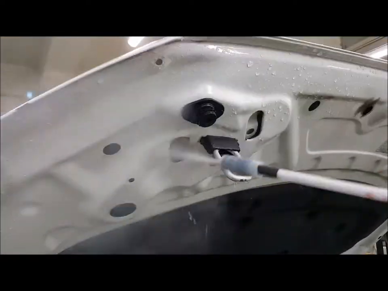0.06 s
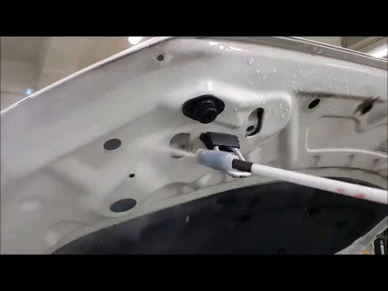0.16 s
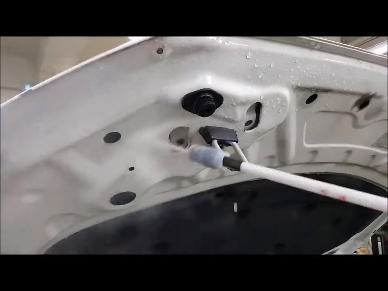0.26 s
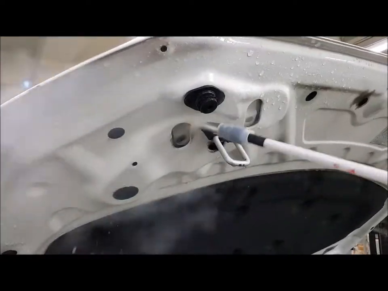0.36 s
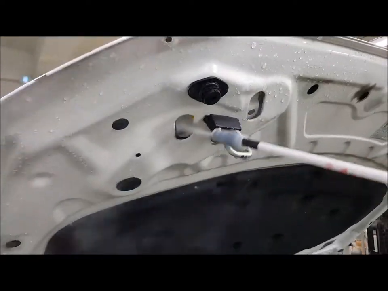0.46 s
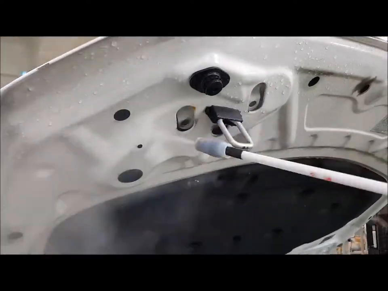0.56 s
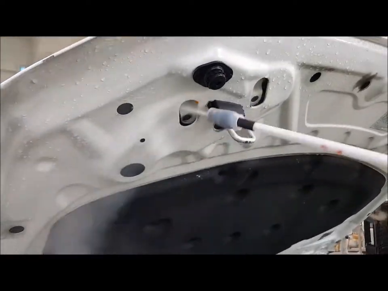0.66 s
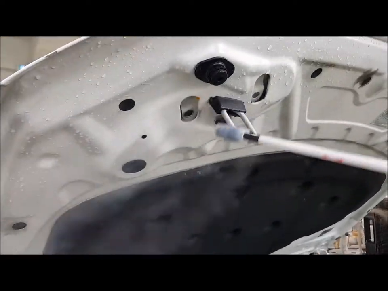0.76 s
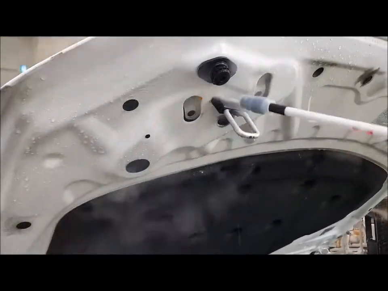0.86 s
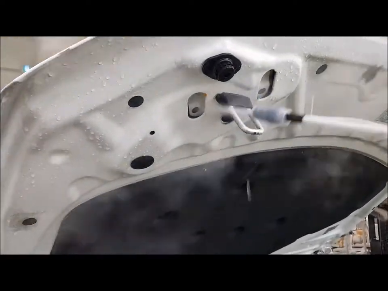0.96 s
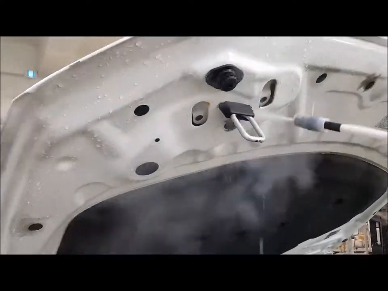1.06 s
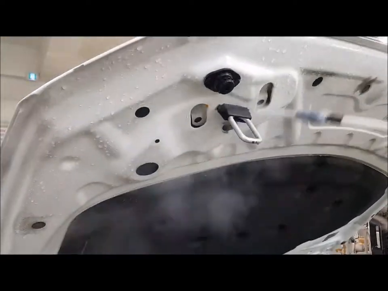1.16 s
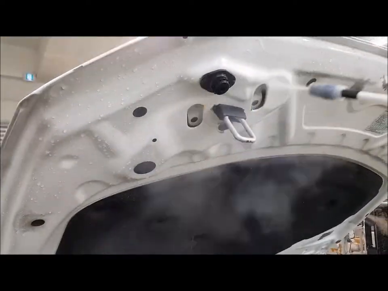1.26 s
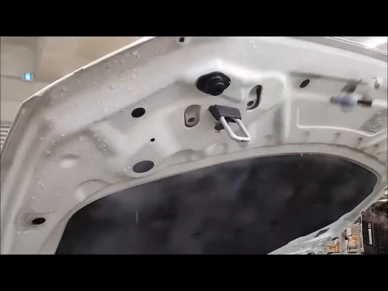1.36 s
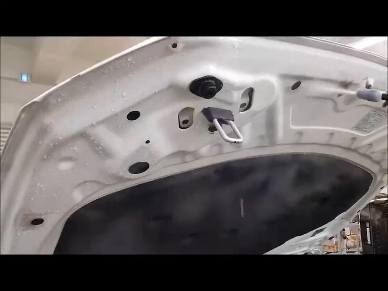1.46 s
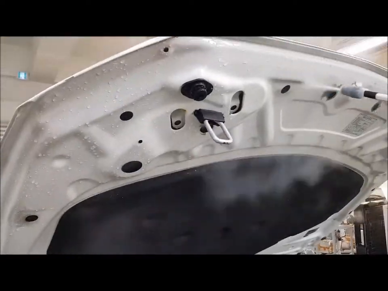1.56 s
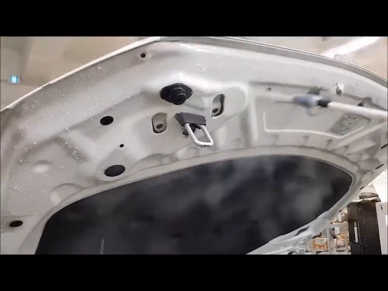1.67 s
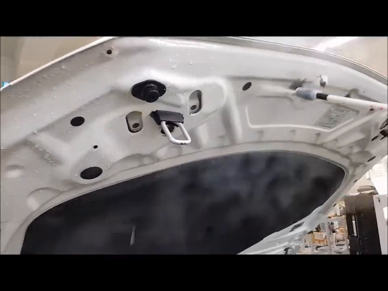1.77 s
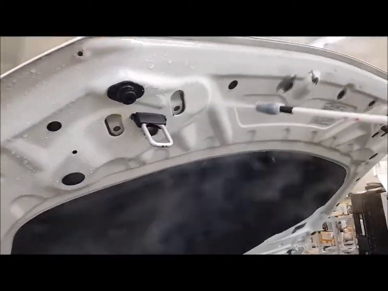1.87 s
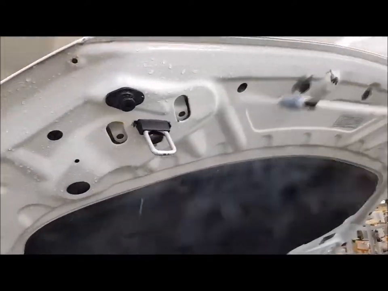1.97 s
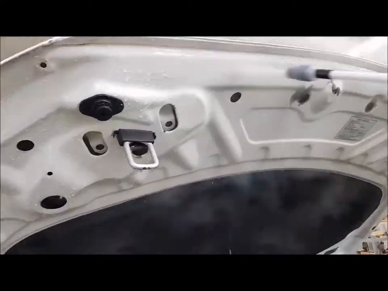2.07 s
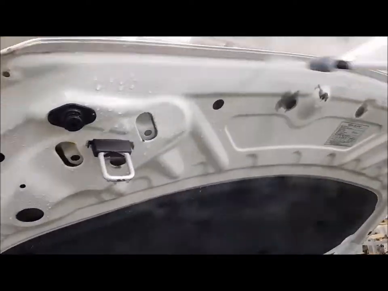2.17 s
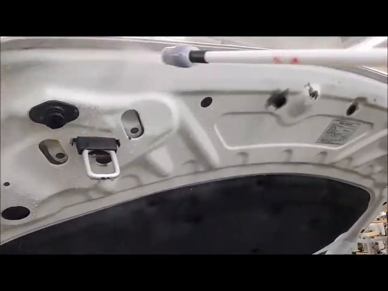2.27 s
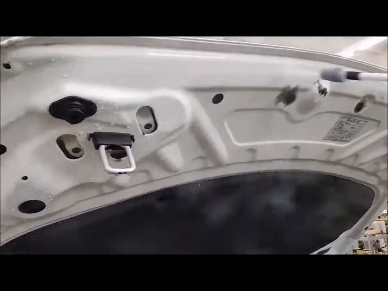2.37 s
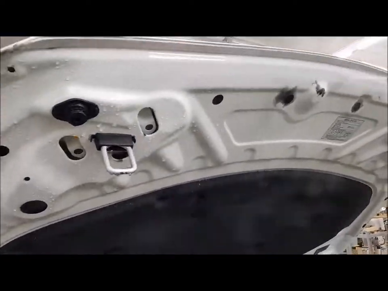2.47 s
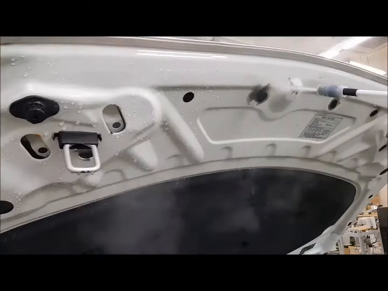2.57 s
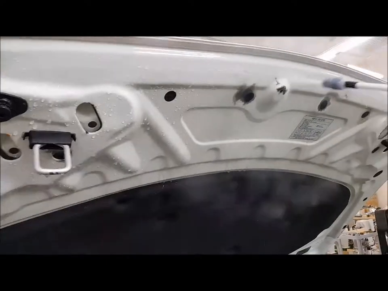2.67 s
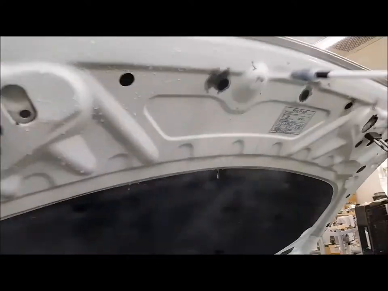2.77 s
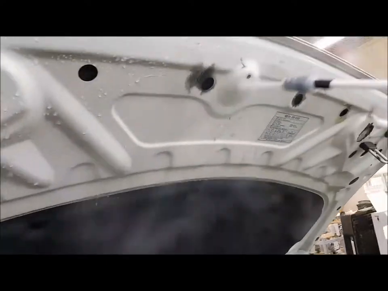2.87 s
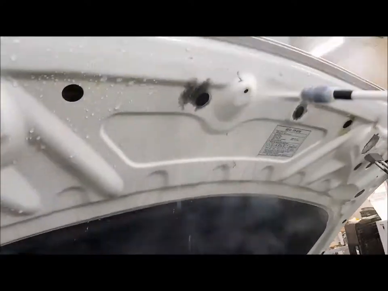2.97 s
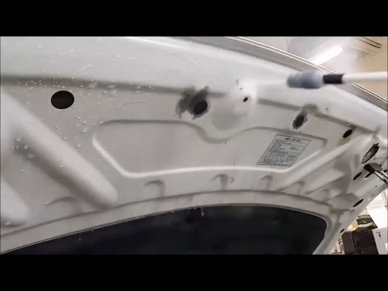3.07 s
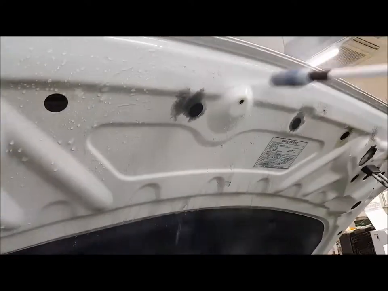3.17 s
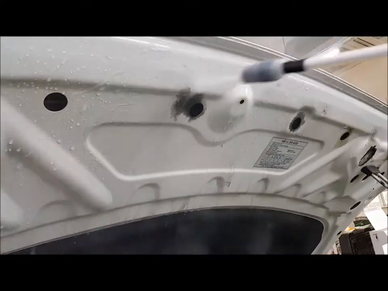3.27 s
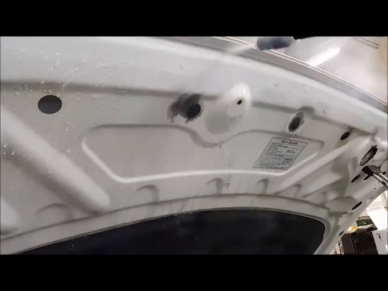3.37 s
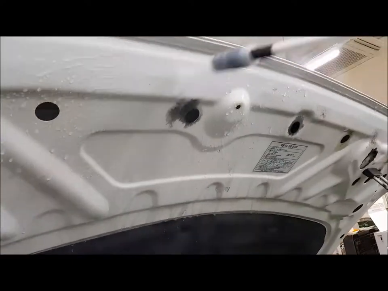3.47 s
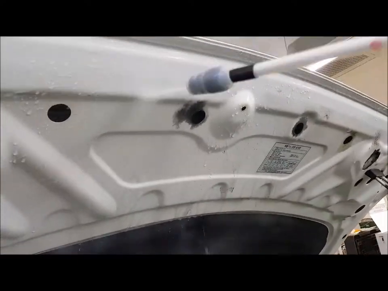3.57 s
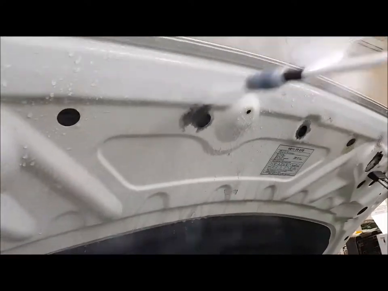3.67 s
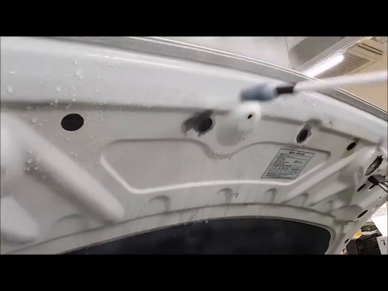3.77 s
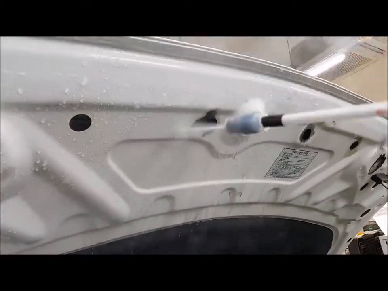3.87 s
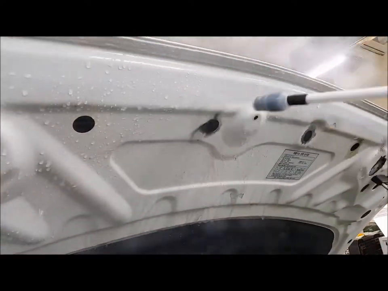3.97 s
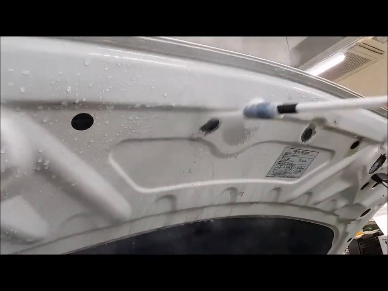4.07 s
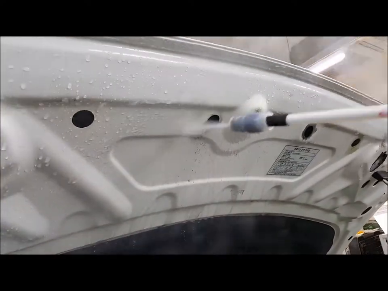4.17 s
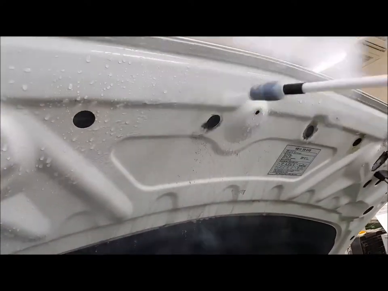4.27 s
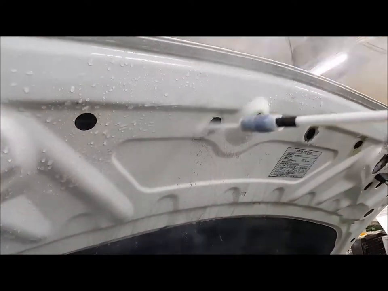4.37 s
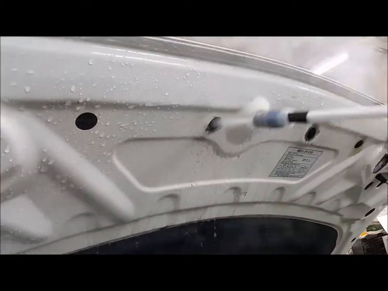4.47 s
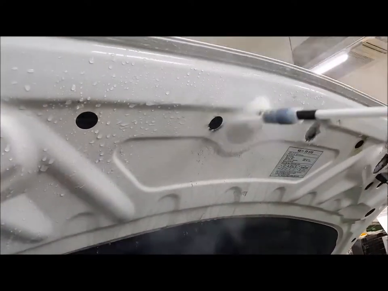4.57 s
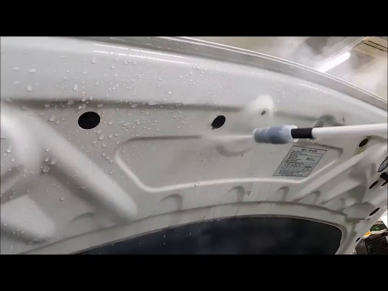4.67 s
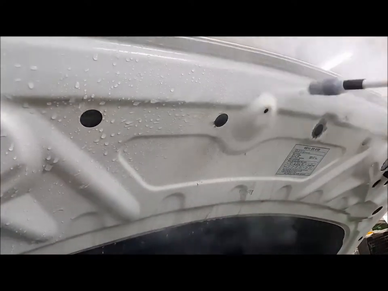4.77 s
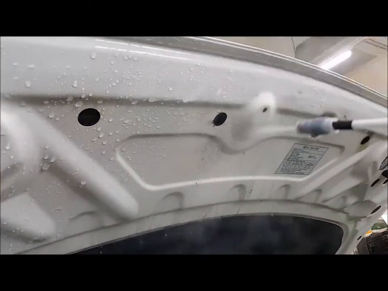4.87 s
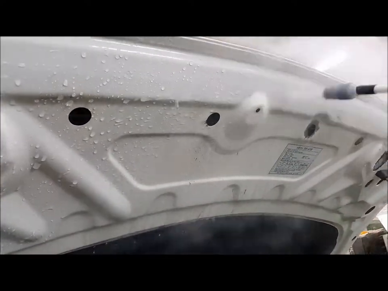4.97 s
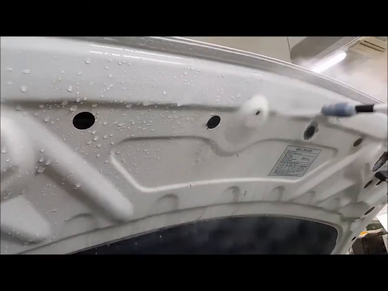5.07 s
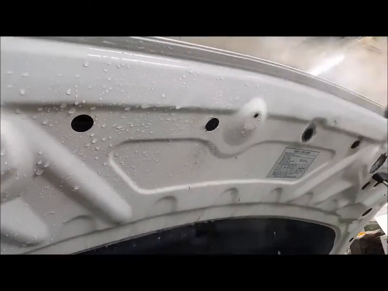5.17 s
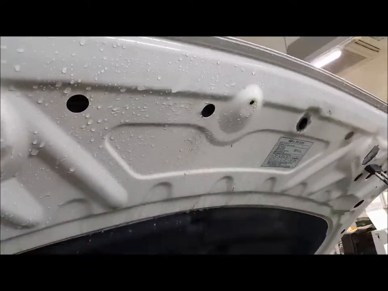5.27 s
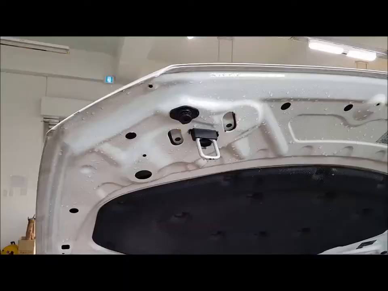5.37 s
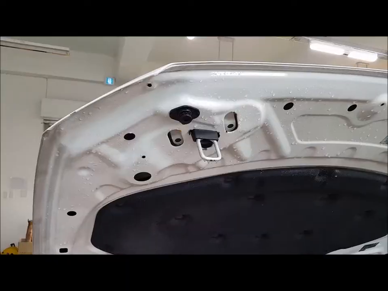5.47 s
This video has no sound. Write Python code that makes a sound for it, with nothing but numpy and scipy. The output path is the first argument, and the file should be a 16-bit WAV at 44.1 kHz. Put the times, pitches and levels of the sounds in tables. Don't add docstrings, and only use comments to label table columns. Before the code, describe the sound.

Loud wet steam hiss, recorded close on a phone in slight stereo, splashes in rapid pulses against hollow sheet metal. It shifts between duller bursts and sharp sizzling, with a few small water thuds. Near the end the spray drops away quickly, an electric pump hum comes up, and the panel booms once, low and short.

```python
import sys
import numpy as np
from scipy import signal
from scipy.fft import rfft, irfft, next_fast_len
from scipy.io import wavfile
from scipy.ndimage import uniform_filter1d

SR = 44100
rng = np.random.default_rng(int(sys.argv[2]) if len(sys.argv) > 2 else 0)


def nominal_scale(level):
    x = np.asarray(level, float) / 20
    return 10 ** x


def master_out(mix):
    frames = np.transpose(np.atleast_2d(mix))
    ceiling = np.clip(frames, -1, 1)
    pcm = np.round(ceiling * 32767).astype(np.int16)
    wavfile.write(sys.argv[1], SR, pcm)


N = 242991
T = np.arange(N) / SR

# (frequency [Hz], density [dB per Hz])
SPRAY_COLOUR = [(35, -38), (100, -39.5), (200, -32), (360, -24), (490, -20.5), (800, -16.5), (1200, -10),
                (1400, -4.5), (2600, -4.5), (4000, -2.5), (6000, -1.5), (9400, 0), (13000, -6),
                (15800, -5.5)]
# (frequency [Hz], free jet [0-1], splash [0-1])
COHERENCE = [(60, .8, 0.8), (300, 0.46, 1), (1400, 0.82, 1), (3160, 0.89, 0.95), (6700, 0.73, 0.77),
             (10900, 0.45, 0.24), (14900, 0.26, 0.32)]
# (drum to, panel from, panel to, body from, body to, sizzle from [Hz])
RANGE_CORNERS = (1000, 1450, 2400, 3300, 5000, 9000)
# (from [Hz], to [Hz])
RANGE_BANDS = ((250, 900), (1250, 2800), (2800, 7000), (7000, 16000))
# (time [s], steam flow as hiss level [dB], extra roar near the metal [dB])
LANCE_MOTION = [(0, -30.5, 2), (.3, -28, 3.5), (1.0, -25.5, -1.5), (1.2, -26, 0.3), (1.5, -28.5, -2),
                (1.8, -30, 1), (2.0, -29.5, -4), (2.35, -29.5, 1.5), (2.6, -31, -0.5), (3.0, -29.5, 0.5),
                (3.2, -27, -4), (3.4, -28, -1.5), (3.6, -28, -4.5), (4.0, -27.5, -1), (4.4, -28.5, -3.5),
                (4.8, -32, 2), (5.0, -27.5, -6), (5.235, -25, -8)]
# (time [s], length [ms], level change [dB])
HOLE_DIPS = [
    (.725, 28, -4.5),
    (1.085, 23, -4),
    (1.205, 15, -3.5),
    (1.58, 30, -2),
    (1.925, 30, -2.5),
    (3.07, 25, -2),
    (3.73, 16, -1),
]
# (time [s], length [ms], extra drumming [dB])
WATER_SLUGS = [
    (.55, 13, 5),
    (.77, 16, 9),
    (4.5, 18, 5.5),
]
# (first
# time [s], last time [s], level [dB], length [ms], sizzle relative to body [dB])
ONTO_RIB = [(.139, .201, -18.5, 19, -15), (.414, .472, -22.5, 7.2, 1), (.445, .561, -22.5, 7.1, 1),
            (.865, .927, -24, 17, 2.5), (.987, 1.048, -21.5, 18, -2), (1.112, 1.112, -18.5, 12, -1.5),
            (1.537, 1.605, -18.5, 12.3, 0.5), (1.682, 1.816, -19.5, 13.7, 1.5),
            (1.719, 1.785, -19, 10.4, 3), (1.975, 1.975, -19, 10, 0), (2.028, 2.028, -23.5, 14, 3),
            (2.84, 2.84, -20.5, 14, -6), (2.903, 2.965, -20.5, 13, 5.5), (3.023, 3.023, -24, 9.1, 2.5),
            (3.149, 3.2, -18, 21.5, -6.5), (3.366, 3.491, -24.5, 21, -7), (3.87, 3.99, -24, 15, -5),
            (4.052, 4.233, -17.5, 11.5, -2), (4.354, 4.415, -20.5, 14, -2), (4.477, 4.602, -16, 9.3, .4),
            (4.663, 4.721, -17, 9.2, 0), (4.781, 4.781, -20, 14, -.4), (4.881, 4.945, -26, 7, 3.5),
            (5.395, 5.395, -52, 18, 9)]
# (first time [s], last time [s], level [dB], length [ms], sizzle relative to body [dB])
OFF_RIB = [(.262, .37, -17, 11.6, -22), (.59, .65, -23.5, 8, 0), (.692, .75, -25.5, 13, 5.5),
           (1.183, 1.183, -21, 8.9, 6), (1.243, 1.243, -22.5, 23, 0), (2.001, 2.058, -19.5, 14.5, 0.5),
           (2.664, 2.735, -16.5, 18.5, -7), (2.866, 2.989, -20, 10.6, 1.5), (3.05, 3.05, -27, 11, -10),
           (3.105, 3.105, -20.5, 7.4, 3.5), (3.258, 3.314, -17, 15, -14), (3.64, 3.693, -31.5, 8.3, 9),
           (3.77, 3.832, -23, 12, -5), (3.955, 4.259, -18, 10, -2), (4.444, 4.751, -18, 12.8, -0.5)]
# (time [s], level [dB], length [ms], sizzle relative to body [dB], panel relative to body [dB])
LONE_EDGES = [(.021, -26, 14, -6, -18), (.095, -14, 24, -27, -11.5), (.796, -25.5, 34, 3.5, -22),
              (1.288, -28.5, 33, 10.5, -5), (1.331, -24, 17, 8, -9), (1.365, -20.5, 13, 6.5, -14),
              (1.396, -25, 19, 5, -11), (1.5, -30, 15, 9.5, -13), (1.649, -18.5, 14, -0.5, -21),
              (1.848, -19.5, 6.5, 2.5, -11), (1.88, -18.5, 6.7, -6, -10.5), (1.943, -26, 8, 4, -7),
              (2.117, -16, 6.1, 2, -11), (2.155, -29.5, 33, 0, -1.5), (2.41, -35.5, 23, 12, 7),
              (2.483, -38.5, 27, -11, 12), (2.611, -34.5, 21, -4, 1), (2.79, -16.5, 16, -12, -10),
              (4.299, -19, 22, -5.5, -16), (4.385, -25, 8.7, -7, -2), (4.835, -28.5, 23, 4.5, -3.5),
              (4.914, -25, 6.5, 4, -14)]
# (from time [s], tones (frequency [Hz], level [dB]))
HOLLOWS = [
    (0, [(4050, 0.5), (4700, -7), (5490, 1.5), (7870, -2.5), (14400, 2)]),
    (.6, [(5580, 5.5), (7000, 2), (8110, -3.5), (8820, 2.5), (11250, 4.5), (12500, -9), (14300, 3)]),
    (1.15, [(5040, -6), (5980, 6), (8000, -10), (9050, 4), (10300, 2), (10910, -13)]),
    (1.45, [(2200, 2), (2550, 6), (2960, -1.5), (3430, 4.5), (4180, 2.5), (5150, -10), (6060, 1.5), (10660, 3)]),
    (2.25, [(6160, 3.5), (12680, -6), (14600, 2)]),
    (2.62, [(2450, 3.5), (2830, -3.5), (3360, 3.5), (4000, 2.5), (5650, 2), (15010, 2)]),
    (3.1, [(2680, -4), (3100, 2), (4020, 2.5), (4570, -1.5), (9900, 1), (11050, 2.5), (12800, 1), (15400, 2)]),
    (3.85, [(2660, -3), (3100, 2), (3990, 3), (4610, -2), (5500, 3), (6650, -2), (10400, 2.5), (12800, 3), (15400, 3)]),
    (4.85, [(10420, 2), (12610, 1.5)]),
]
# (panel under jet [dB], panel under splash [dB], left minus right [dB],
# drumming [dB], air at the top [dB])
PANEL_RESPONSE = [(-5.5, -14, 1.4, 0.5, 0), (-8, -11, .7, 0, .3), (-10, -7.5, -0.3, -0.5, 1),
                  (-5.5, -11.5, -0.5, -2, 0.5), (-9, -9, -.2, 1.7, -1), (-7, -8, .3, -1, 1.5),
                  (-4.5, -8.5, .5, 0.7, 1), (-5, -11, -0.3, -0.5, 1), (-11, -7.5, -.9, 0.5, -1.2)]
# (time [s], frequency [Hz], level [dB], decay time T60 [s])
PANEL_BOOM = (5.453, 220, -30, .8)
# (frequency [Hz], level [dB rms])
PUMP_LINES = [(240, -63), (480.5, -52), (960.3, -47), (1201, -57), (1441, -47.5), (2643, -65), (4199, -62),
              (5283, -61), (5522, -62)]

TOP_HZ = 15860
SPIN_HZ = 16.3
LONE_LEAN = 0.092


def walk(rate):
    hold = int(SR / rate)
    steps = np.repeat(rng.standard_normal(N // hold + 1), hold)
    level = uniform_filter1d(uniform_filter1d(steps, hold), hold)[:N]
    return level / level.std()


def bell(centre_s, length_ms):
    return np.exp(-.5 * ((T - centre_s) / (length_ms / 2355)) ** 2)


def place_index():
    return np.searchsorted([start for start, _ in HOLLOWS], T, side="right") - 1


def at_place(column, glide_s=.2):
    held = np.asarray(column, float)[place_index()]
    return uniform_filter1d(held, int(glide_s * SR), mode="nearest")


def free_jet():
    _, flow, near = (np.interp(T, np.transpose(LANCE_MOTION)[0], c) for c in np.transpose(LANCE_MOTION))
    panel, _, pan, drum, air = (at_place(c) for c in np.transpose(PANEL_RESPONSE))
    drum = drum - 50.5 + 0.69 * T + 1.5 * walk(11)
    drum = drum + sum(db * bell(s, ms) for s, ms, db in WATER_SLUGS)
    db = np.array([drum, flow + panel + 0.23 * near, flow + near, flow])

    release_s, fall_s, release_pan_db = 5.239, 0.02, -2
    drop_db, dribble_db_per_s = (1, -9, -8.5, -19), (-36, -26, -45, -32)
    after = np.maximum(T - release_s, 0)
    shut = 1 - np.exp(-after / fall_s)
    db = db + np.outer(drop_db, shut) + np.outer(dribble_db_per_s, after)

    shake_db, shake_after_s, shake_s = (14, 9.2, 7.5, 5), 0.028, 0.021
    shake = np.exp(-.5 * ((T - PANEL_BOOM[0] - shake_after_s) / shake_s) ** 2)
    db = db + np.outer(shake_db, shake) + 0.19 * walk(21.87)
    db[1:] += sum(dip_db * bell(s, ms) for s, ms, dip_db in HOLE_DIPS)
    return db, pan + release_pan_db * shut * (1 - shake), air


def strikes():
    panel, rows = at_place(np.transpose(PANEL_RESPONSE)[1]), []
    scatter_db, scatter_length = .4, .06
    for table, lean in ((ONTO_RIB, 0.31), (OFF_RIB, -0.16)):
        for first, last, db, ms, sizzle_db in table:
            turns = round((last - first) * SPIN_HZ) + 1
            for s in np.linspace(first, last, turns):
                a, b = rng.standard_normal(2)
                length_ms = ms * np.exp(scatter_length * b)
                rows.append((s, db + scatter_db * a, length_ms, panel[int(s * SR)], sizzle_db, lean))
    for s, db, ms, sizzle_db, panel_db in LONE_EDGES:
        rows.append((s, db, ms, panel_db, sizzle_db, LONE_LEAN))
    return rows


def splash_power():
    power = np.zeros((3, N))
    for s, db, ms, panel_db, sizzle_db, lean in strikes():
        near = slice(max(int((s - .06) * SR), 0), int((s + .08) * SR))
        spread_s = ms / 2355
        u = (T[near] - s + .5 * lean * spread_s) / spread_s
        side = 1 + np.clip(lean + 0.092, -.8, .8) * np.sign(u)
        level_db = db + np.array([[panel_db], [0], [sizzle_db]])
        power[:, near] += np.exp(-.5 * (u / side) ** 2) * nominal_scale(2 * level_db)
    return power


def spray():
    jet_db, pan, air = free_jet()
    splash_db = 10 * np.log10(splash_power() + 1e-9) + 1.56 * walk(450)
    splash_db = np.vstack([splash_db[0] - 27.5, splash_db])

    size = next_fast_len(N)
    hz = np.arange(size // 2 + 1) * SR / size + 1e-3
    colour_hz, colour_db = np.transpose(SPRAY_COLOUR)
    colour = nominal_scale(np.interp(np.log(hz), np.log(colour_hz), colour_db))
    lag = 1.11
    noise = rfft(rng.standard_normal((3, size))) * colour
    noise = np.vstack([noise, noise[0] * np.exp(-2j * np.pi * hz * lag / SR)])
    unit_db = [-10 * np.log10(np.sum(colour[(hz > a) & (hz < b)] ** 2) * 2 / size) for a, b in RANGE_BANDS]

    coherence_hz, *coherence = np.transpose(COHERENCE)
    out, step = 0, np.log(2) / 2
    for centre in 18900 / np.exp(step * np.arange(16)):
        window = np.cos(np.pi / 2 * np.clip(np.log(hz / centre) / step, -1, 1)) ** 2
        part = irfft(noise * window, size)[:, :N]
        weight = np.array([np.interp(np.log(centre), np.log(RANGE_CORNERS), row[[0, 1, 1, 2, 2, 3]])
                           for row in np.eye(4)])
        height = (centre / TOP_HZ) ** 2
        base_db = weight @ unit_db
        jet = nominal_scale(2 * (weight @ jet_db + base_db + air * height + 1.37 * walk(14)))
        splash = nominal_scale(2 * (weight @ splash_db + base_db - 8 * height + 1.17 * walk(60)))
        like = [np.clip(np.interp(np.log(centre), np.log(coherence_hz), c), 0, 1) for c in coherence]
        shared = part[[0, 3]] * np.sqrt(like[0] * jet + like[1] * splash)
        own = part[1:3] * np.sqrt((1 - like[0]) * jet + (1 - like[1]) * splash)
        in_phase = np.cos(np.pi * min(centre, TOP_HZ) * lag / SR) ** 2
        summed = np.mean(like) * in_phase + (1 - np.mean(like)) / 2
        lean_db = pan - 3.5 * height
        out = out + (shared + own) * nominal_scale(np.array([lean_db, -lean_db]) / 2) / np.sqrt(summed)
    return out


def hollows(x, glide_s=0.25):
    size = next_fast_len(N)
    hz = np.arange(size // 2 + 1) * SR / size
    spectrum, out, place = rfft(x, size), 0, place_index()
    for k, (_, tones) in enumerate(HOLLOWS):
        db = 0
        for f, tone_db in tones:
            width_hz = 250 + .022 * f
            db = db + np.clip(tone_db, -4, 6) * np.exp(-4 * np.log(2) * ((hz - f) / width_hz) ** 2)
        here = uniform_filter1d(1. * (place == k), int(glide_s * SR), mode="nearest")
        out = out + here * irfft(spectrum * nominal_scale(db), size)[:, :N]
    depth = np.clip(1.47 + 0.17 * walk(8.3), 0, 1.7)
    return x + depth * (out - x)


def echo(x, ms):
    return np.interp(np.arange(N) - ms * SR / 1000, np.arange(N), x)


def bonnet(x):
    out, echo_gain = x, .16
    for ms, sign in zip(rng.uniform(0.79, 4, 3), (1, -1, 1)):
        path_ms = ms * (1 + 0.0808 * walk(3))
        out = out + sign * echo_gain * np.array([echo(channel, path_ms) for channel in x])
    return out


def boom():
    s, hz, db, t60 = PANEL_BOOM
    u = np.maximum(T - s, 0)
    rise = 1 - np.exp(-u / .0015)
    decay = np.exp(-np.log(1000) * u / t60)
    return nominal_scale(db) * rise * decay * np.sin(2 * np.pi * hz * u + .3 * walk(60))


def pump():
    lines = 0
    for hz, db in PUMP_LINES:
        tone = np.sqrt(2) * np.sin(2 * np.pi * (hz * T + rng.random()))
        lines = lines + nominal_scale(db + 2.2 * walk(25)) * tone
    rumble_db, rumble_hz = -58.5, (90, 385)
    band = signal.butter(2, rumble_hz, "bandpass", fs=SR, output="sos")
    rumble = signal.sosfilt(band, rng.standard_normal(N))
    opens_s, creep_db_per_s, open_db_per_s, duck_db_per_s = 4.914, 1.5, 26.5, -250
    gain_db = -19.5 + creep_db_per_s * T + open_db_per_s * np.maximum(T - opens_s, 0)
    duck = nominal_scale(duck_db_per_s * np.maximum(T - PANEL_BOOM[0], 0))
    return (lines * duck + nominal_scale(rumble_db) * rumble / rumble.std()) * nominal_scale(gain_db)


def scene():
    return bonnet(hollows(spray())) + pump() + boom()


def band_limit(x):
    return signal.sosfilt(signal.butter(12, 16740, fs=SR, output="sos"), x)


def record(dry, ceiling=0.76):
    size = next_fast_len(N + SR // 4)
    hz = np.arange(size // 2 + 1) * SR / size
    passed = np.clip((TOP_HZ - hz) / 120, 0, 1) * hz / np.hypot(hz, 45)
    soft = dry / (1 + (dry / ceiling) ** 6) ** (1 / 6)
    mix = irfft(rfft(soft, size) * passed, size)[:, :N]
    return band_limit(mix)


dry = scene()
out = record(dry)
master_out(out)
```